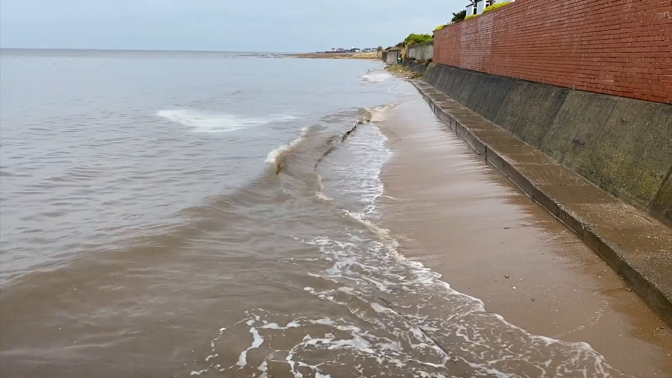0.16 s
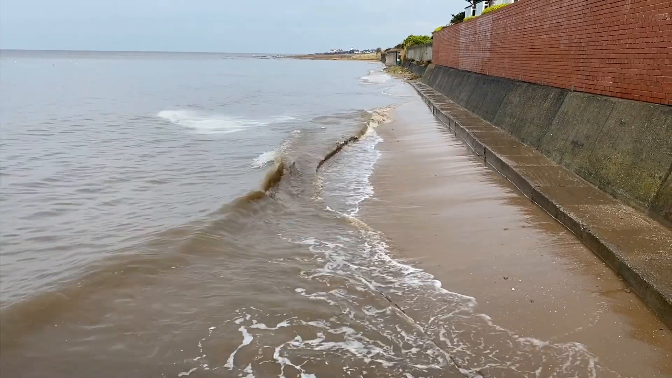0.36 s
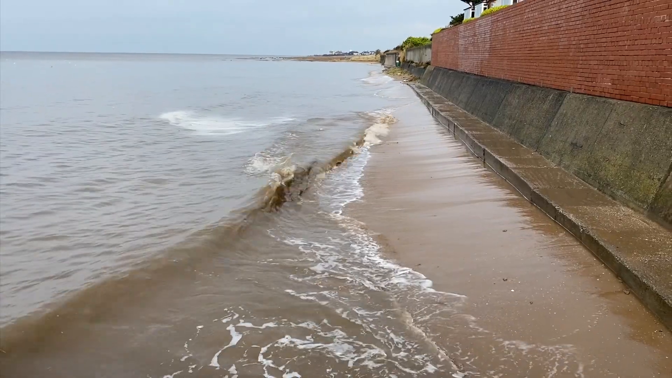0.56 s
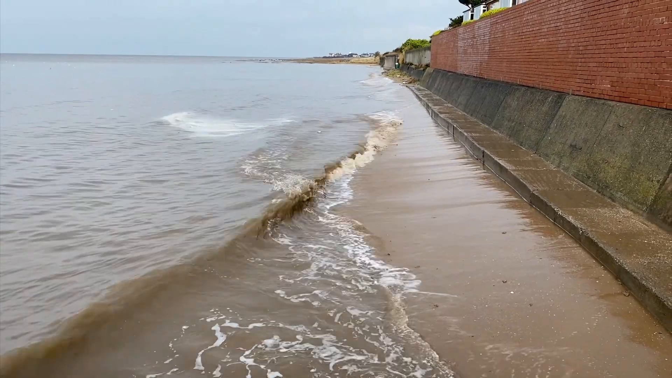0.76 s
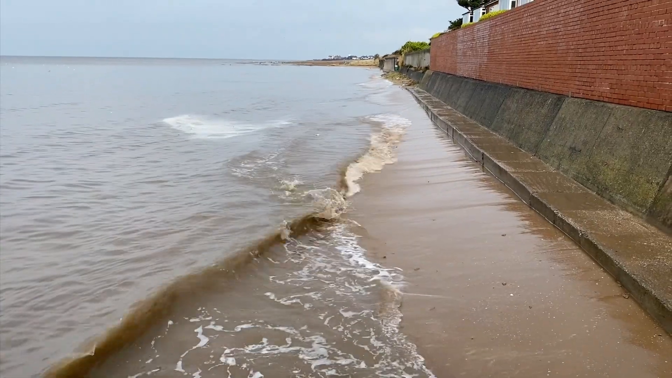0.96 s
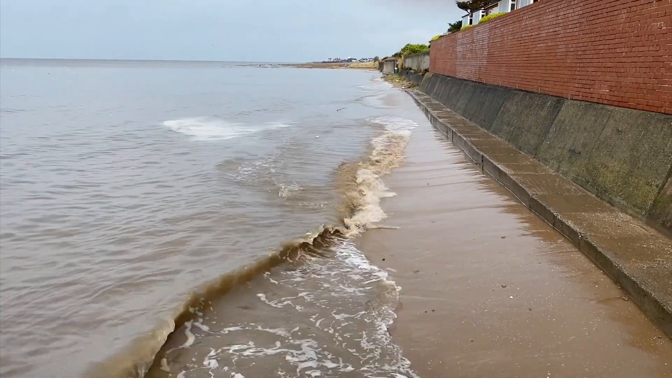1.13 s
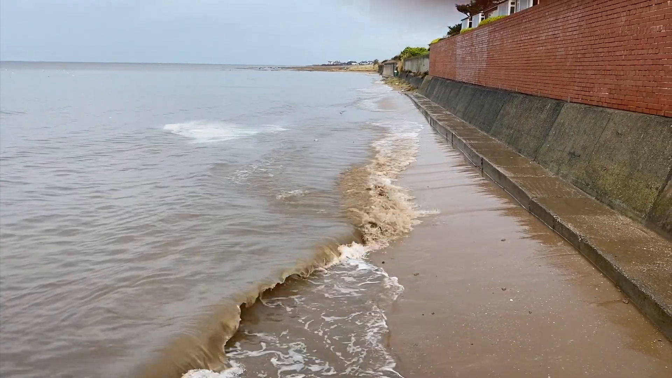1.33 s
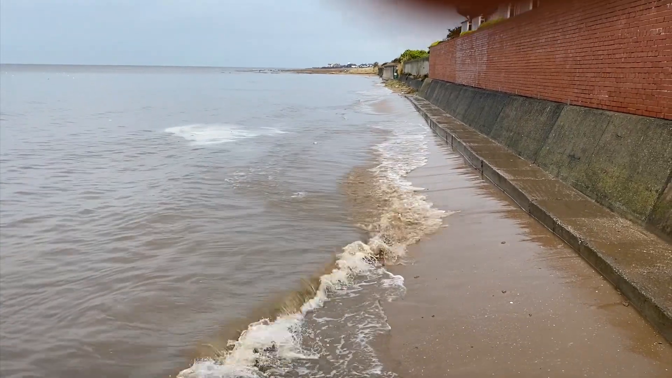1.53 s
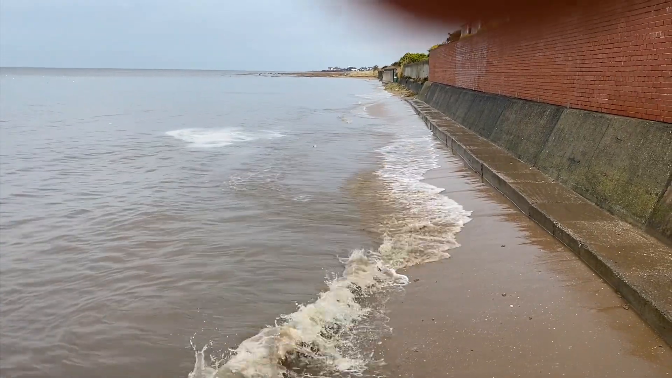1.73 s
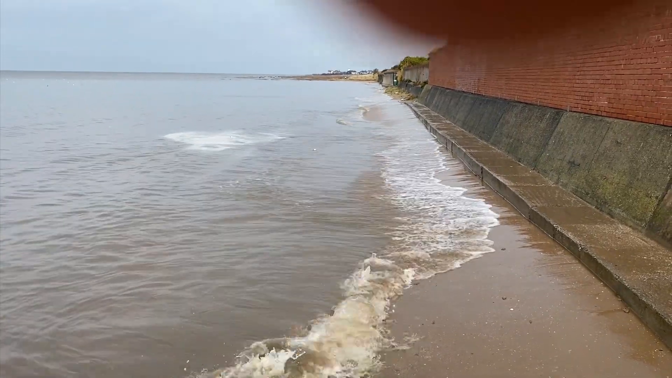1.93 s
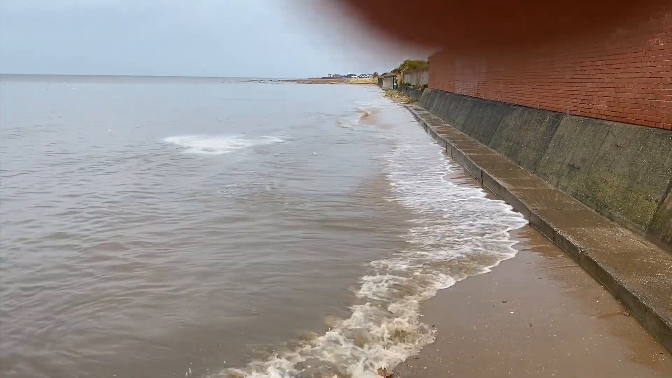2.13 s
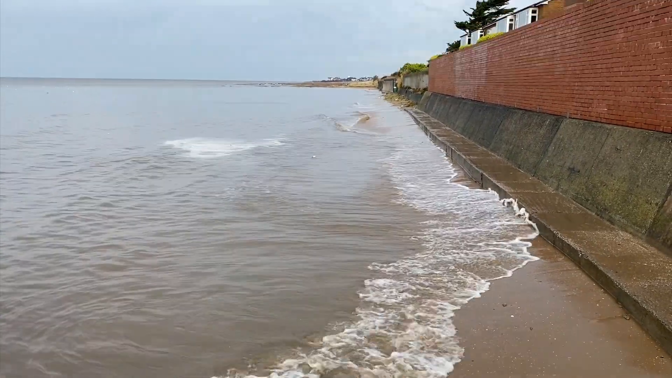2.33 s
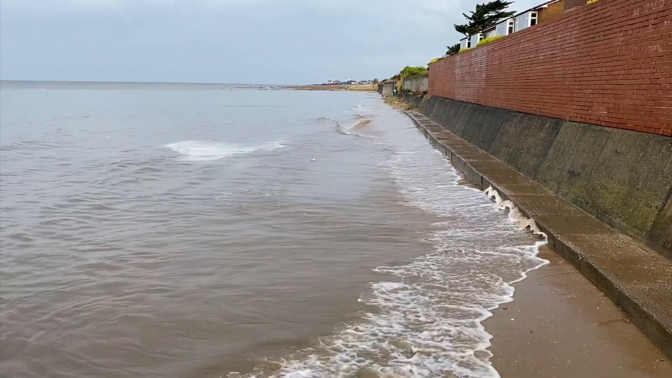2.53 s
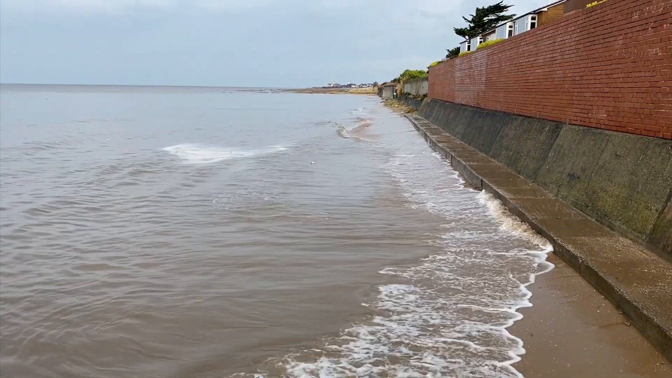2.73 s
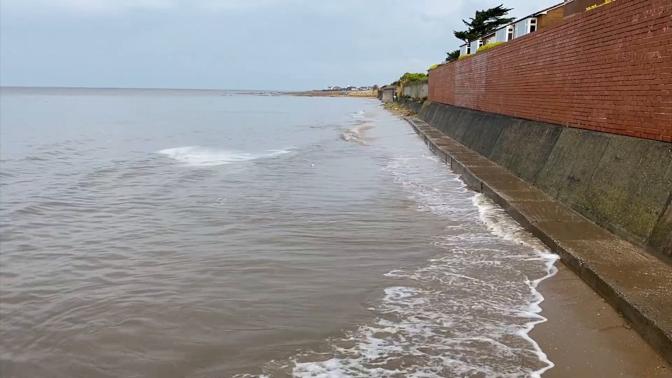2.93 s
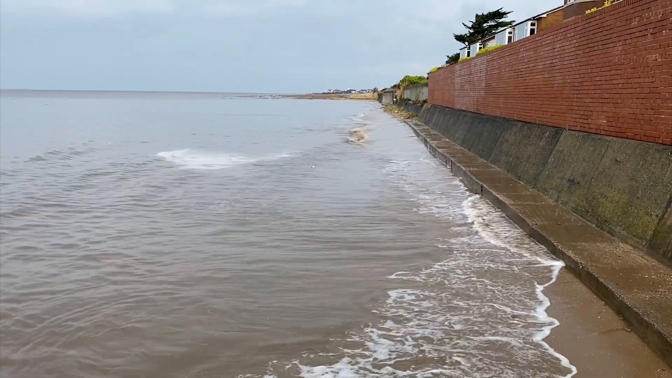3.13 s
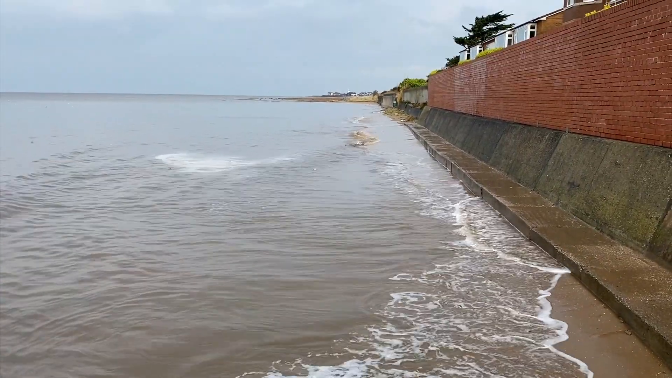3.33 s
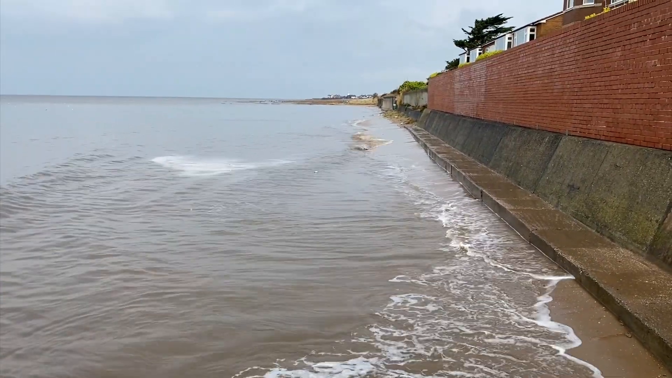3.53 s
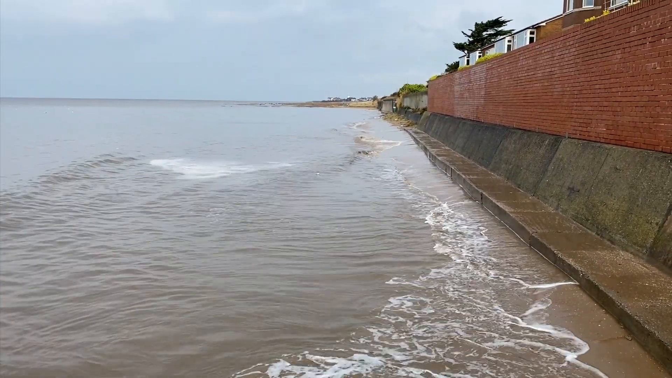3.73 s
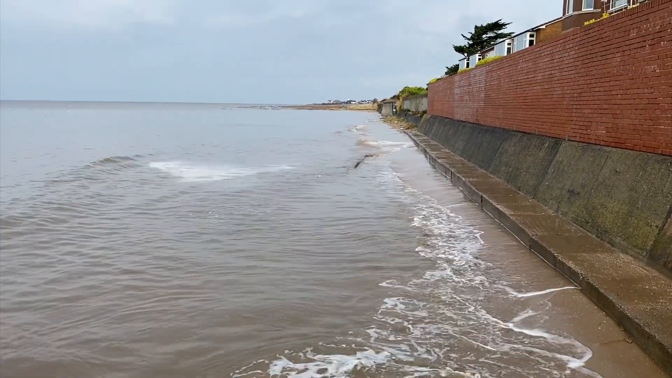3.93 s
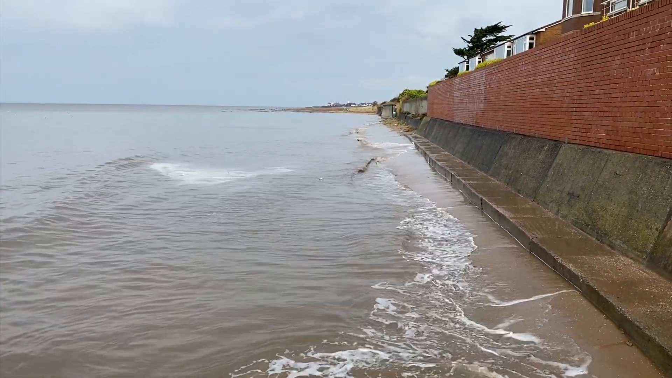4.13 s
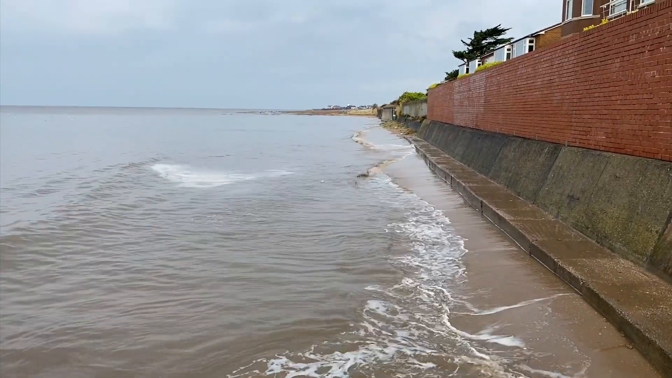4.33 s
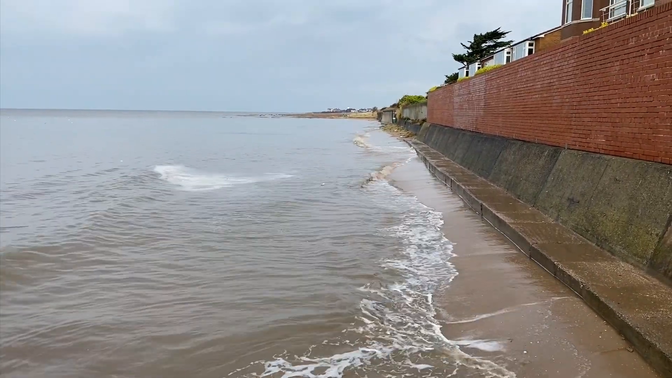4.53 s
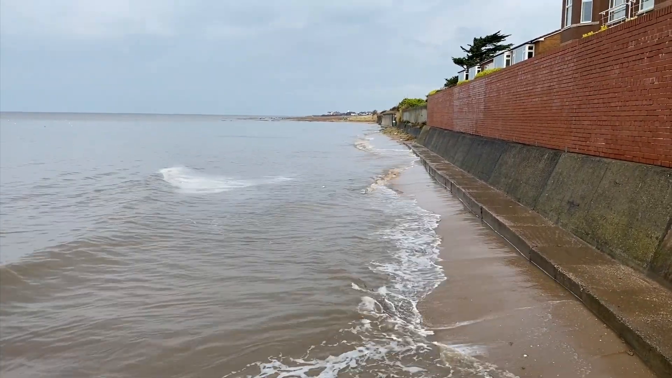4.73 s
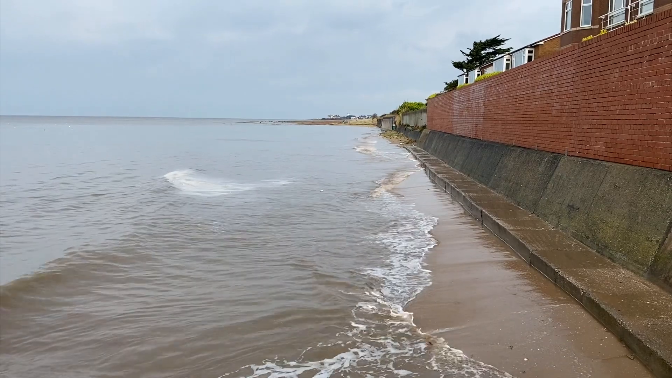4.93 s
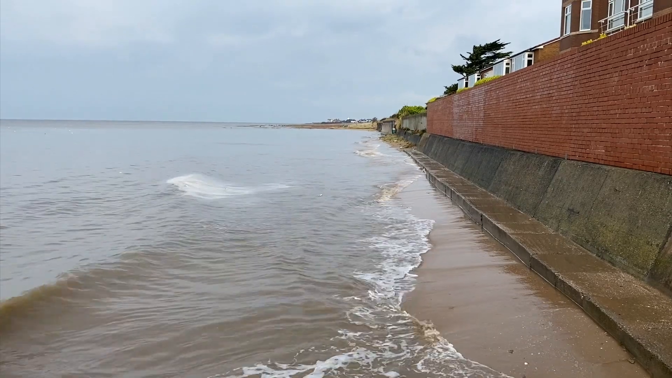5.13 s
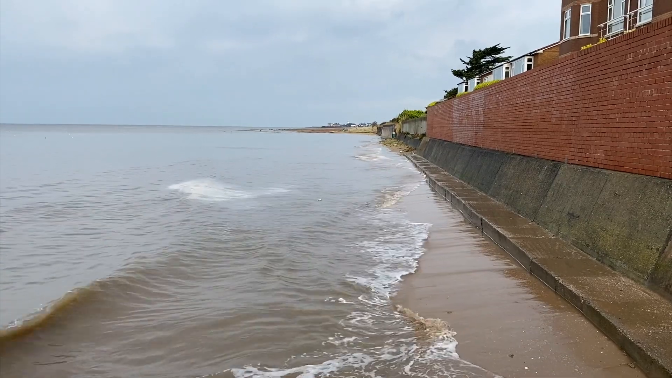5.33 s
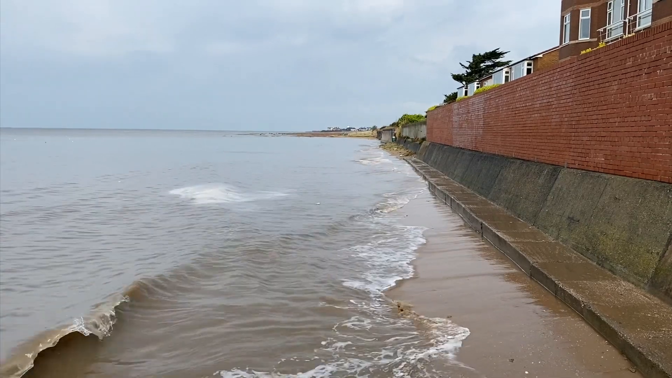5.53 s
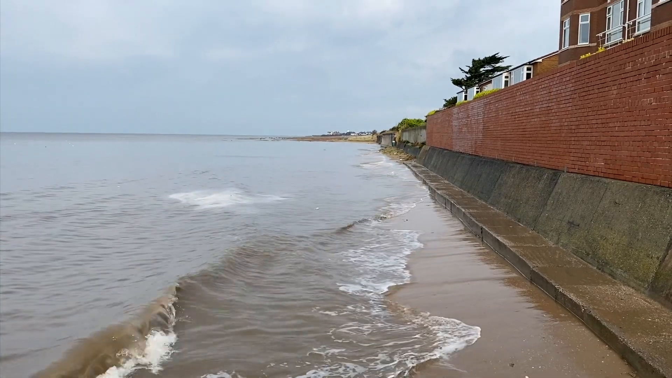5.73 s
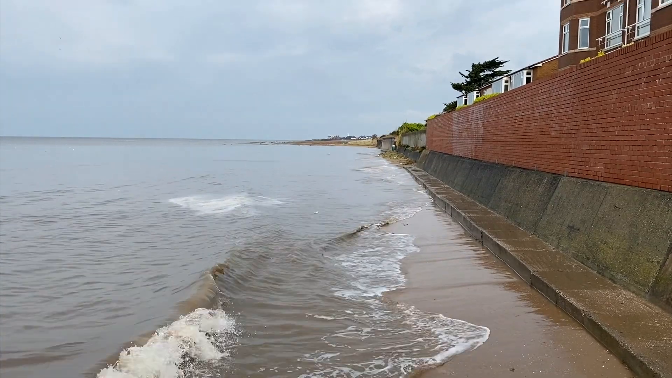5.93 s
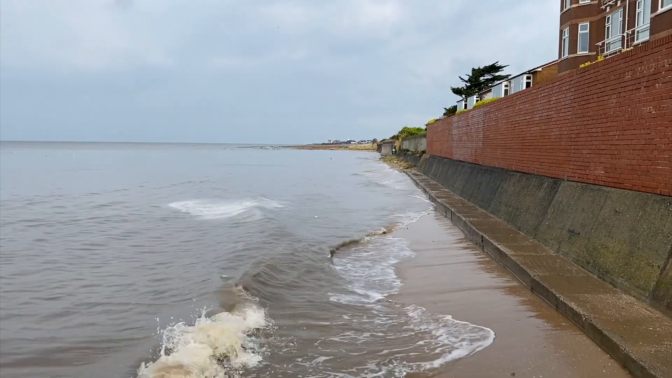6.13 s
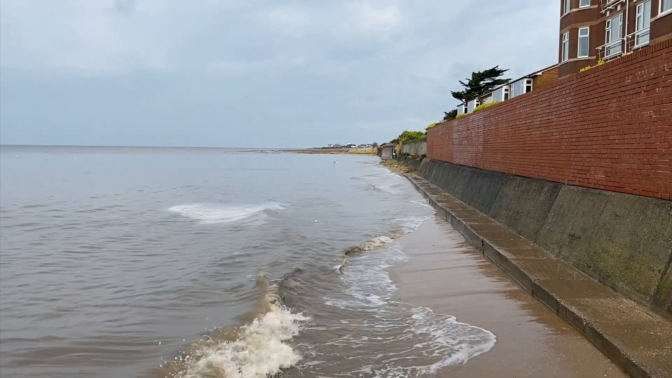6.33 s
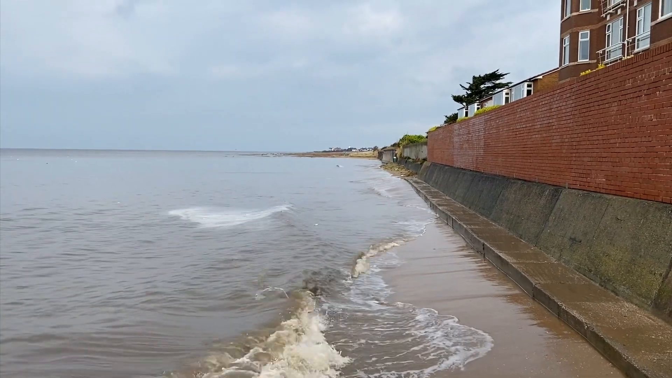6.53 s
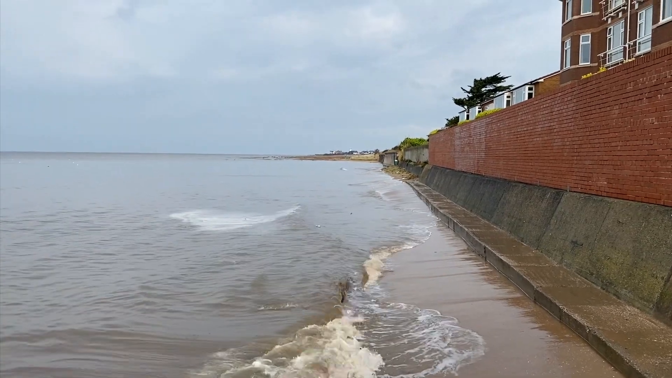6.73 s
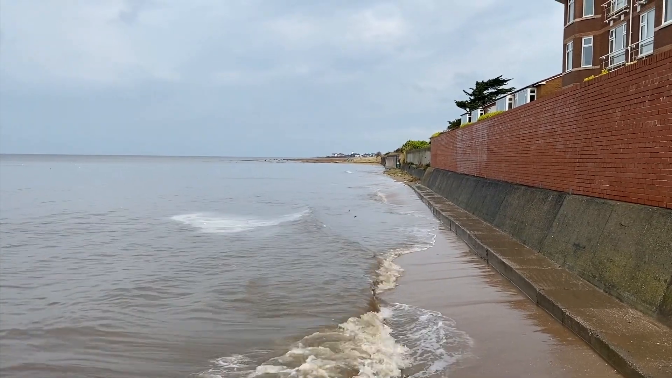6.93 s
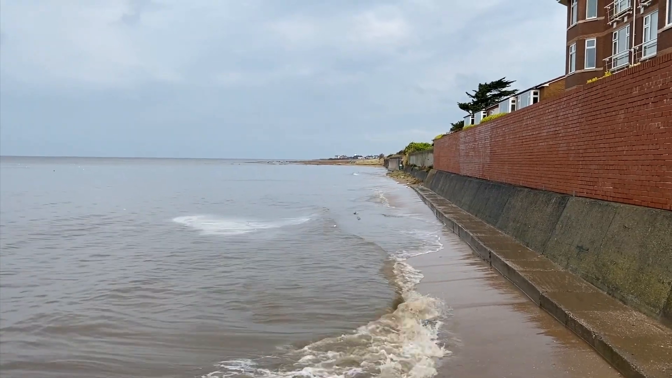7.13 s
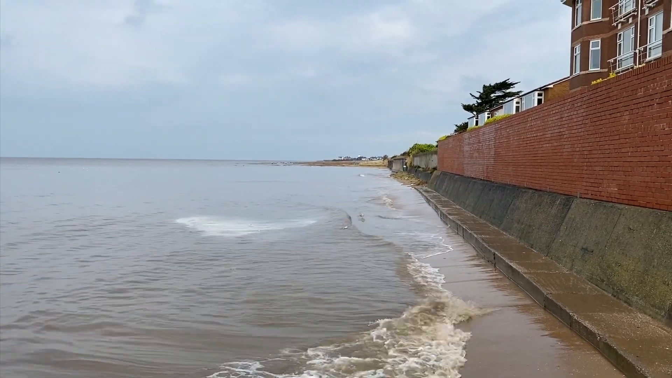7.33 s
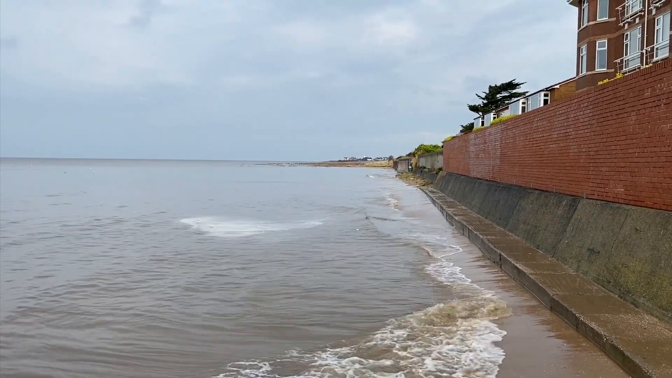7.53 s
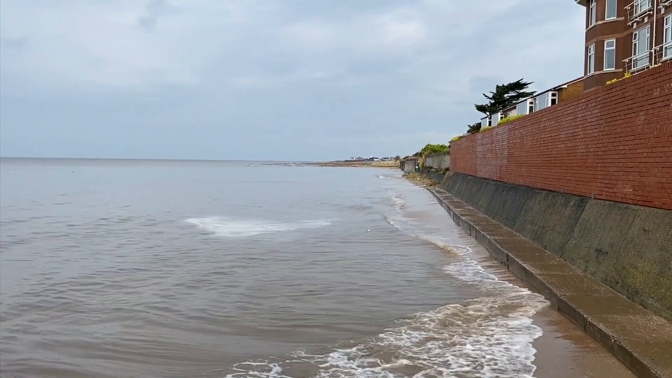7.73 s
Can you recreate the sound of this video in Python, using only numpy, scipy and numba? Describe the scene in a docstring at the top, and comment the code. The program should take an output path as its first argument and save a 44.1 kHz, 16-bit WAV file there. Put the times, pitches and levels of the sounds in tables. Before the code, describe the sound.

A hand-held phone close to the water picks up two small waves breaking on sand beside a sea wall. At first there is quiet lapping and gurgling, with a bubbly plop near 0.6 s. Slaps and glugs gather around 1.1 s; at 1.4 s the lip shuts with a hollow thump, and the wash swells to a full, low, splashing roar around 1.8 s with hissing spray. Foam fizzes up the sand, with small slaps near 2.5 s, then thins from 3 to 5 s into soft trickles, plinks and drop ticks. A dull double slap comes at about 5.15 s. From 5.55 s the second wave breaks in a cluster of glugs, cracks and thuds, leaning left, with a heavy thump at 6.15 s and churning wash until about 7 s. It drains away, with small slaps near 7.7 s. Low wind gusts rumble, strongest around 1.7 and 5.8-6.6 s.

```python
"""Small waves break and run up the sand below a sea wall, a few metres from a hand-held phone in a breeze.
Thump, wash, foam and spray are each a dense noise roar with single ringing bubbles standing out of it.
Slaps lift these layers briefly; trapped air glugs and slams as swelling sine rings, drops tick as noise.
Wind rumbles on the phone's two microphone ports over a faint treble microphone hiss, both banded noise."""
import sys
import numpy as np
from scipy import signal
from scipy.fft import rfft, irfft, next_fast_len
from scipy.io import wavfile
from scipy.ndimage import uniform_filter1d
from numba import njit

SR = 44100
rng = np.random.default_rng(int(sys.argv[2]) if len(sys.argv) > 2 else 0)


def store_pcm(level_fs):
    """Save levels as 16-bit WAV."""
    pcm = np.round(np.clip(level_fs, -1, 1) * 32767).astype(np.int16)
    wavfile.write(sys.argv[1], SR, np.atleast_2d(pcm).T)


N = 347067  # samples, about 7.9 s


def undb(db):
    """Decibels to amplitude gain."""
    return 10 ** (np.asarray(db) / 20)


def unit(x):
    """Scale to rms 1."""
    return x / np.sqrt(np.mean(x ** 2))


def colour_db(table, hz):
    """Read a spectrum on a log-frequency axis."""
    freq_hz, level_db = np.transpose(table)
    return np.interp(np.log(hz), np.log(freq_hz), level_db)


def curves(table):
    """Interpolate each column after start_s to one value a sample."""
    start_s, *columns = np.transpose(table)
    return [np.interp(np.arange(N) / SR, start_s, column) for column in columns]


def walk(rate_hz):
    """Random levels, each held for 1 / rate_hz, smoothed twice and scaled to rms 1."""
    hold = int(SR / rate_hz)
    steps = np.repeat(rng.standard_normal(N // hold + 1), hold)
    smooth = uniform_filter1d(uniform_filter1d(steps, hold), hold)
    return unit(smooth[:N])


@njit
def ring(start, hz, cycles, size, turn, glide, n, sr):
    """Bubbles that swell for some cycles, then die away while their pitch rises; two directions, unlike phase."""
    out = np.zeros((2, n))
    for e in range(len(start)):
        tau = cycles[e] * sr / hz[e]  # samples to the loudest point
        step, phase = 2 * np.pi * hz[e] / sr, 0.
        for i in range(min(int(5 * tau), n - start[e])):
            gain = size[e] * (i / tau * np.exp(1 - i / tau)) ** 2
            phase += step * (1 + glide * i / tau)
            out[0, start[e] + i] += gain * np.sin(phase)
            out[1, start[e] + i] += gain * np.sin(phase + turn[e])
    return out


def bubbles(start_s, peak_db, pitch_hz, cycles, glide):
    """Ring a row of bubbles, each with a random phase between the two directions."""
    turn = 2 * np.pi * rng.random(len(start_s))
    start = (start_s * SR).astype(np.int64)
    return ring(start, 1. * pitch_hz, cycles + 0. * start_s, undb(peak_db), turn, glide, N, 1. * SR)


def roar(table, shared_db, own_db, own_rate_hz):
    """A dense roar: noise in seven bands that swell together and flicker alone."""
    n = next_fast_len(N)
    f = np.maximum(np.fft.rfftfreq(n, 1 / SR), 1)
    noise = rfft(rng.standard_normal((2, n))) * undb(colour_db(table, f))
    low, high = np.log2(table[0][0]), np.log2(table[-1][0])
    out, swell = 0, walk(11)
    for centre in np.linspace(low, high, num=7):
        distance = np.clip((np.log2(f) - centre) * 6 / (high - low), -1, 1)
        band = np.cos(np.pi / 2 * distance) ** 2
        level_db = shared_db * swell + own_db * walk(own_rate_hz)
        out = out + irfft(noise * band, n)[:, :N] * undb(level_db)
    return unit(out)


def cloud(table, count, cycles, scatter_db):
    """Single bubbles at random times and pitches, some louder than the rest."""
    when, pitch, luck = rng.random((count, 3)).T
    hz = table[0][0] * (table[-1][0] / table[0][0]) ** pitch
    peak_db = colour_db(table, hz) + 20 * np.log10(hz) + scatter_db * luck ** 3
    return unit(bubbles(when * N / SR, peak_db, hz, cycles, 0.025))


# Colour of the falling crest: freq_hz [Hz], level_db [relative dB per Hz]
THUMP_COLOUR = [(40, -22), (80, -8), (120, 1), (190, 1.5), (280, -3), (450, -19.5)]


def crest_thump():
    """The falling crest: a low roar with deep bubbles in it."""
    dense = roar(THUMP_COLOUR, shared_db=0.42, own_db=2.45, own_rate_hz=17)
    single = cloud(THUMP_COLOUR, count=500, cycles=1.73, scatter_db=10.5)
    return unit(dense + undb(-5.0) * single)


# Colour of the gurgling wash: freq_hz [Hz], level_db [relative dB per Hz]
WASH_COLOUR = [(130, -26), (250, -4.5), (320, -3), (430, -0.5), (650, -4.5), (780, -6.5), (950, -6.5),
               (1120, -12), (1350, -12), (2000, -24.5), (3000, -26)]


def gurgling_wash(trickle):
    """Water running up the sand: a mid roar whose single bubbles follow the trickle gain."""
    dense = roar(WASH_COLOUR, shared_db=1.0, own_db=0.57, own_rate_hz=18)
    single = cloud(WASH_COLOUR, count=2500, cycles=3.3, scatter_db=8.0)
    return unit(dense + trickle * undb(-7.5) * single)


# Colour of the fizzing foam: freq_hz [Hz], level_db [relative dB per Hz]
FOAM_COLOUR = [(900, -7.5), (1500, -5.5), (2300, -8.5), (2800, -9), (3600, -9.5), (4600, -11.5),
               (5800, -17), (8000, -16)]


def fizzing_foam(trickle, bright_db, burst):
    """Foam of small bubbles: fresh foam holds smaller ones and sounds brighter than old."""
    dense = roar(FOAM_COLOUR, shared_db=0.2, own_db=0.91, own_rate_hz=25)
    single = cloud(FOAM_COLOUR, count=3000, cycles=5.9, scatter_db=12.0)
    foam = dense + trickle * undb(-9.0) * single
    dull = signal.sosfilt(signal.butter(2, 2200, fs=SR, output="sos"), foam)
    tilted = undb(-bright_db) * dull + undb(bright_db) * (foam - dull)
    return unit(burst * tilted)


# Colour of the spray: freq_hz [Hz], level_db [relative dB per Hz]
SPRAY_COLOUR = [(4500, -11), (6500, -4), (8000, -7.5), (10500, 0.5), (13000, -1.5), (15500, -7),
                (20000, -30)]


def hissing_spray(burst):
    """Spray: a treble roar and many short high rings, lifted by the splashes."""
    dense = roar(SPRAY_COLOUR, shared_db=0.49, own_db=0.93, own_rate_hz=30)
    single = cloud(SPRAY_COLOUR, count=12000, cycles=6.4, scatter_db=11.0)
    return unit(burst * (dense + undb(-5.5) * single))


def splashes(count, rise_db, long_s):
    """Gain that jumps and decays wherever a small splash bursts, across foam and spray at once."""
    when, size = rng.random((count, 2)).T
    kicks = np.zeros(N)
    kicks[(when * N).astype(int)] = size ** 2
    decay = signal.lfilter([1], [1, -np.exp(-1 / (long_s * SR))], kicks)
    return undb(rise_db * decay + 0.21 * walk(14))


# Colour of the microphone hiss: freq_hz [Hz], level_db [relative dB per Hz]
MIC_HISS_COLOUR = [(5000, -15), (9000, -10.5), (20000, -5.5)]


def mic_hiss():
    """Microphone hiss: a faint steady treble noise floor."""
    return undb(-53) * roar(MIC_HISS_COLOUR, shared_db=0.3, own_db=0.3, own_rate_hz=9)


# Narrow bands that wax and wane: from_hz [Hz], to_hz [Hz]
WAXING_BANDS = [(330, 418), (530, 536), (1300, 1760), (2550, 2870)]
# Their levels: start_s [s], then level_db [dB] near 400 Hz, in a very narrow band near 533 Hz,
# near 1.5 kHz and near 2.75 kHz
WAXING_CURVES = [(0.0, 2.5, 1.5, -2, 0), (1.0, 1, 0, -1, 0.5), (1.7, -2.5, 3, -1, 0),
                 (2.5, -3.5, -1.5, 1, -1), (3.0, -1, -7, 7, -4), (3.5, 6, -4, -0.5, -3),
                 (4.1, -2, -9, 1, 0.5), (4.6, 3, -5, 0, -2), (5.0, 6, 3.5, 2, 2), (5.4, 0.5, 0.5, -2, 1),
                 (5.58, -3, 4, -15, 2), (5.8, -1.5, 0, -6, -1.5), (6.3, -4, 3, -2.5, 3),
                 (6.9, -0.5, -3, -2, 4.5), (7.4, -2, -1.5, 1.5, 2.5), (7.87, 1, 1, 3.5, 1)]


def tint(sound):
    """Lift or lower each narrow band in turn along its curve."""
    for edges_hz, level_db in zip(WAXING_BANDS, curves(WAXING_CURVES)):
        band = signal.lfilter(*signal.butter(1, edges_hz, "bandpass", fs=SR), sound)
        sound = sound + (undb(level_db) - 1) * band
    return sound


# Wind at the microphone ports: start_s [s], level_db [dB]
WIND_LEVELS = [(0.0, -53), (0.58, -42), (0.75, -36), (0.9, -43), (1.3, -37.5), (1.7, -27), (2.25, -43.5),
               (2.92, -51), (3.03, -35.5), (3.7, -38.5), (3.86, -35), (4.3, -39), (5.2, -37), (5.33, -47),
               (5.7, -46), (5.8, -24.5), (6.0, -29.5), (6.55, -25), (6.85, -30), (7.3, -35), (7.5, -41),
               (7.87, -39)]
# Colour of the wind: freq_hz [Hz], level_db [relative dB per Hz]
WIND_COLOUR = [(22, -40), (40, -4), (60, 6.5), (90, 6.5), (140, -4.5), (250, -19)]


def breeze():
    """Wind on the microphone ports: gusting low noise."""
    wind_db, = curves(WIND_LEVELS)
    return undb(wind_db) * roar(WIND_COLOUR, shared_db=2.85, own_db=0.79, own_rate_hz=15)


# Parts of the crest and small waves slapping down:
# peak_s [s], thump_jump_db [dB], spray_jump_db [dB], length_s [s]
SLAP_JUMPS = [(0.22, 7, -1, 0.042), (0.607, 4, 3, 0.059), (0.77, 5.5, -1.5, 0.039), (1.104, 5.5, 6, 0.061),
              (1.4, 4, 2.5, 0.055), (1.676, 2, -1.5, 0.033), (1.805, 0.5, 1, 0.05),
              (2.044, 4.5, -0.5, 0.14), (2.458, 5.5, 4, 0.12), (2.724, 3.5, 1.5, 0.099),
              (3.71, 2.5, 1, 0.18), (3.826, 2.5, -1.5, 0.083), (5.139, 7.5, 2.5, 0.037),
              (5.188, 4.5, 4.5, 0.021), (5.58, 2.5, 0.5, 0.034), (5.808, 8, 5, 0.024),
              (6.113, 1.5, 0.1, 0.064), (6.22, 2.5, 2, 0.046), (6.45, 0.5, -2, 0.06),
              (6.605, 1.5, -1.7, 0.067), (7.4, 3, -1, 0.04), (7.658, 4, 1, 0.028), (7.802, 8, 4, 0.03)]
SLAP_RISE = 0.63  # rise time as a share of the length


def slaps():
    """Brief level jumps, quick up and slower down: dB for the low layers and for the high ones."""
    peak_s, low_db, high_db, length_s = np.transpose(SLAP_JUMPS)
    grid = np.arange(0, N + 64, 64)  # coarse steps, filled in below
    late = (grid[:, None] / SR - peak_s) / length_s
    shape = np.exp(-np.where(late < 0, late / SLAP_RISE, late) ** 2)
    return [np.interp(np.arange(N), grid, shape @ jump_db) for jump_db in (low_db, high_db)]


# Two breakers build, crash and drain away, levels before the slaps and tints:
# start_s [s], thump_db [dB], wash_db [dB], foam_db [dB], spray_db [dB]
BREAKERS = [(0.0, -45, -36.5, -39.5, -57), (0.5, -44.5, -32, -41, -59), (0.62, -50, -33.5, -38, -50.5),
            (1.0, -36, -29.5, -34, -49.5), (1.24, -31, -27.5, -32, -44), (1.29, -31.5, -26.5, -30.5, -41.5),
            (1.82, -22.5, -23, -31.5, -36.5), (2.15, -38, -29.5, -32, -42), (2.6, -37, -33.5, -39.5, -49.5),
            (2.92, -45, -39.5, -46.5, -49.5), (3.25, -39.5, -36.5, -47, -52),
            (3.52, -44.5, -38.5, -49, -54.5), (3.72, -48, -37.5, -45.5, -55.5),
            (3.88, -47, -41, -49.5, -54), (4.14, -50, -40, -47, -60.5), (4.38, -50, -37.5, -42.5, -55),
            (4.75, -38, -34.5, -42, -58), (5.39, -43.5, -40, -46, -60), (5.43, -43, -35.5, -41.5, -55),
            (5.51, -44, -37.5, -40, -51), (5.55, -33, -34.5, -33.5, -48), (5.68, -35.5, -26.5, -30.5, -38),
            (5.95, -28, -26.5, -34.5, -40), (6.3, -26, -24, -33, -37), (6.7, -26.5, -24.5, -33, -40.5),
            (7.3, -35, -30, -36.5, -46), (7.72, -42, -37, -42, -50.5), (7.87, -57, -35.5, -41.5, -49)]
BRIGHT_PER_DB, EVEN_DB = 0.29, -5.5  # tilt as spray gains on foam; spray minus foam where it is neutral
TRICKLE_PER_DB, TRICKLE_DB = 0.27, -40.5  # bubbles stand out as foam thins; foam level where neutral
SLAP_WASH, SLAP_FOAM = 0.65, 0.88  # wash takes a share of the thump's jump, foam of the spray's


def breakers():
    """Each of the four surf layers follows its curve and jumps at the slaps."""
    thump_db, wash_db, foam_db, spray_db = curves(BREAKERS)
    low_db, high_db = slaps()
    bright_db = BRIGHT_PER_DB * (spray_db - foam_db - EVEN_DB)
    trickle = undb(TRICKLE_PER_DB * (TRICKLE_DB - foam_db))
    burst = splashes(count=160, rise_db=5.0, long_s=0.013)
    surf = undb(thump_db + low_db) * crest_thump()
    surf = surf + undb(wash_db + SLAP_WASH * low_db) * gurgling_wash(trickle)
    surf = surf + undb(foam_db + SLAP_FOAM * high_db) * fizzing_foam(trickle, bright_db, burst)
    return surf + undb(spray_db + high_db) * hissing_spray(burst)


# Drops ticking on the water: start_s [s], level_db [dB]
DROP_TICKS = [(0.429, -40), (0.444, -37), (1.334, -27), (2.8772, -41), (3.0833, -40), (3.1646, -39),
              (3.27, -41), (4.2208, -35), (4.2597, -37), (4.395, -41), (5.704, -25.5), (6.219, -30)]
DROP_FADE_S = 0.0045


def drops():
    """A drop lands with a sharp crack of band-passed noise that dies away exponentially."""
    t = np.arange(N) / SR
    shape = np.zeros(N)
    for start_s, level_db in DROP_TICKS:
        fade = np.exp(-np.maximum(t - start_s, 0) / DROP_FADE_S)
        shape += undb(level_db) * (t >= start_s) * fade
    band = signal.butter(2, [1300, 5500], "bandpass", fs=SR, output="sos")
    return shape * unit(signal.sosfilt(band, rng.standard_normal((2, N))))


# Bubbles that stand out, from air pockets under the crest to plinks in the foam:
# start_s [s], peak_db [dB], pitch_hz [Hz]
AIR_POCKETS = [(0.582, -36, 3630), (0.65, -20, 623), (1.097, -21, 110), (1.086, -17, 432),
               (1.103, -19, 528), (1.119, -21, 920), (1.122, -18, 476), (1.448, -20, 453),
               (1.468, -19, 387), (1.522, -24, 577), (1.58, -18.5, 283), (1.794, -13.5, 237),
               (1.851, -18.5, 254), (2.486, -19.5, 365), (2.555, -37, 3000), (2.593, -33, 3100),
               (2.76, -33, 2400), (3.14, -41, 3350), (3.349, -39, 4300), (3.729, -38, 1940),
               (3.753, -40, 4020), (3.835, -29, 105), (3.981, -40, 2240), (4.147, -39, 1900),
               (4.257, -33, 2380), (4.419, -37, 2090), (4.65, -38, 1750), (4.733, -40, 2700),
               (5.121, -17, 120), (5.124, -36, 3300), (5.143, -32.5, 3120), (5.524, -33, 740),
               (5.529, -18, 612), (5.592, -20, 478), (5.62, -27, 696), (5.65, -25, 563),
               (5.664, -21.5, 1170), (5.687, -19, 600), (5.706, -16, 760), (5.706, -26, 2000),
               (5.735, -24, 1260), (5.745, -19, 83), (5.765, -18.5, 900), (5.766, -16.5, 283),
               (5.784, -21, 243), (5.803, -16, 784), (5.82, -17, 161), (6.932, -17, 427),
               (7.036, -29, 4910), (7.402, -21, 437), (7.777, -27, 694), (7.789, -25, 412)]
GLUG_CYCLES, GLUG_SLOPE = 3.06, 0.396  # cycles to the loudest point at 1 kHz; higher bubbles take more


def glugs(spread=0.16, twin_db=-9.0, scatter=1.32):
    """Each pocket breaks up: four quieter neighbours ring around it, off in pitch, before and after."""
    start_s, peak_db, pitch_hz = np.transpose(AIR_POCKETS)
    cycles = GLUG_CYCLES * (pitch_hz / 1000) ** GLUG_SLOPE
    out = bubbles(start_s, peak_db, pitch_hz, cycles, 0.012)
    for _ in range(4):
        late, tune = rng.standard_normal((2, len(start_s)))
        twin_s = start_s + scatter * late * cycles / pitch_hz
        twin_hz = pitch_hz * np.exp(spread * tune)
        out = out + bubbles(twin_s, peak_db + twin_db, twin_hz, cycles, 0.0081)
    return out


# The lip of the wave slamming shut on trapped air: start_s [s], peak_db [dB], pitch_hz [Hz]
LIP_SLAMS = [(1.393, -5.5, 290), (1.665, -11.5, 120), (1.735, -13, 170), (1.77, -14, 170),
             (1.941, -13, 266), (5.122, -17, 210), (5.193, -17.5, 119), (5.2, -22, 220), (5.549, -13, 250),
             (5.567, -17, 248), (5.788, -12, 130), (6.114, -12.5, 167), (6.153, -6, 177), (6.58, -11, 133),
             (7.612, -25, 110), (7.654, -16, 131), (7.678, -27, 110)]


def slams():
    """A single dull beat: a low ring that peaks after about half a cycle."""
    start_s, peak_db, pitch_hz = np.transpose(LIP_SLAMS)
    return bubbles(start_s, peak_db, pitch_hz, 0.49, 0.01)


# The two microphone ports below the treble:
# freq_hz [Hz], likeness [0-1], left_lead [rad], left_minus_right_db [dB]
PORT_PAIR = [(60, 0.97, -0.27, 0.8), (350, 0.93, 0.36, 2.4), (830, 0.73, 0.84, 5), (1180, 0.68, 0.77, 3.5),
             (1950, 0.76, 0.46, 4.5), (2920, 0.72, 0.95, 5.5), (4070, 0.72, 0.46, 4.5),
             (4940, 0.48, 0.39, 2), (5600, 0.2, -.2, 9.5)]
TREBLE_HZ = 5720  # above it both channels carry nearly one signal
TREBLE_LAG_S = 10 / SR
TREBLE_NOISE = 0.3  # share of independent noise in the right channel's treble


def ports(sound):
    """Left hears one direction, right a blend of both; in the treble right is inverted and slightly early."""
    f = np.maximum(np.fft.rfftfreq(N, 1 / SR), 1)
    hz, *columns = np.transpose(PORT_PAIR)
    like, lead, pan_db = (np.interp(np.log(f), np.log(hz), column) for column in columns)
    like = np.clip(like, 0, 1)
    first, second = rfft(sound)
    fade = np.clip((f - TREBLE_HZ) / 700 + .5, 0, 1) * np.pi / 2  # 700 Hz wide crossfade
    low = like * np.exp(-1j * lead) * first + np.sqrt(1 - like ** 2) * second
    blend = np.sqrt(1 - TREBLE_NOISE ** 2) * first + TREBLE_NOISE * second
    high = -np.exp(2j * np.pi * f * TREBLE_LAG_S) * blend
    pan = undb(pan_db / 2 * np.cos(fade))
    left = first * pan
    right = (np.cos(fade) ** 2 * low + np.sin(fade) * high) / pan
    return irfft(np.array([left, right]), N)


# The sound moves towards the left as the second wave falls: start_s [s], extra_left_minus_right_db [dB]
LEFTWARD_DRIFT = [(0.0, -2), (5.3, -0.9), (5.75, 2), (6.3, -0.3), (7.87, -2.5)]


def drift(both):
    """Shift the balance of the body of the sound, mainly 250 Hz up to the treble, between the ports."""
    drift_db, = curves(LEFTWARD_DRIFT)
    body = signal.lfilter(*signal.butter(1, [250, TREBLE_HZ], "bandpass", fs=SR), both)
    return both + (undb(np.array([drift_db, -drift_db]) / 2) - 1) * body


def scene():
    """Surf, wind, drops and trapped air in two unrelated directions, heard at the phone's two ports."""
    sound = tint(breakers() + mic_hiss()) + breeze() + drops() + glugs() + slams()
    return drift(ports(sound))


def record(dry):
    """The phone drops the deepest bass and cuts the top."""
    bass_cut = signal.butter(2, 35.2, "highpass", fs=SR, output="sos")
    top_cut = signal.ellip(10, .2, 80, 15750, fs=SR, output="sos")
    return signal.sosfilt(top_cut, signal.sosfilt(bass_cut, dry))


dry = scene()
out = record(dry)
store_pcm(out)
```